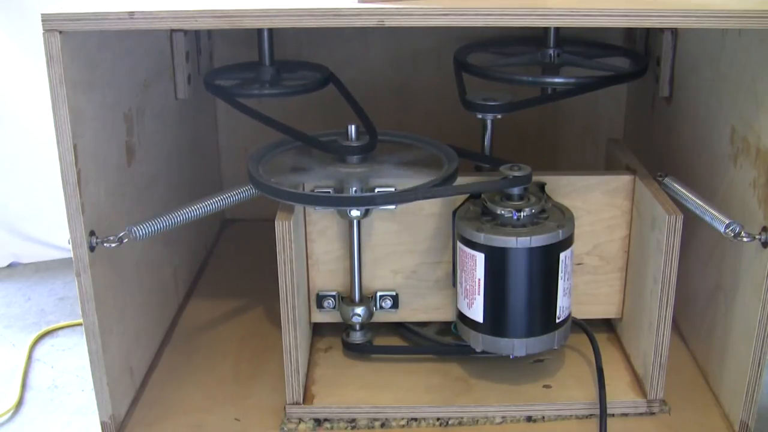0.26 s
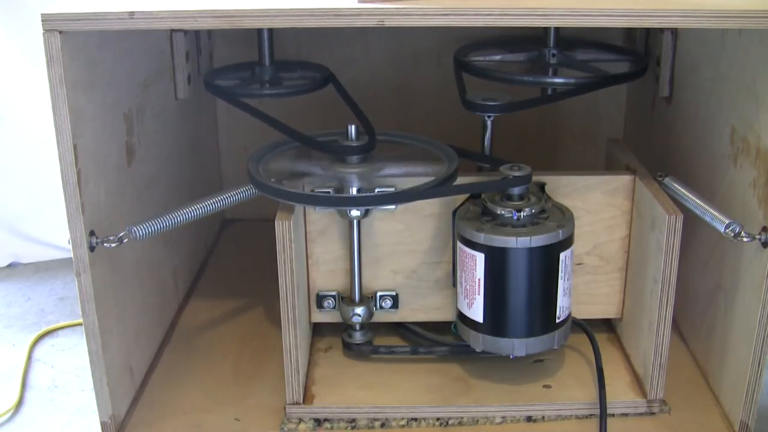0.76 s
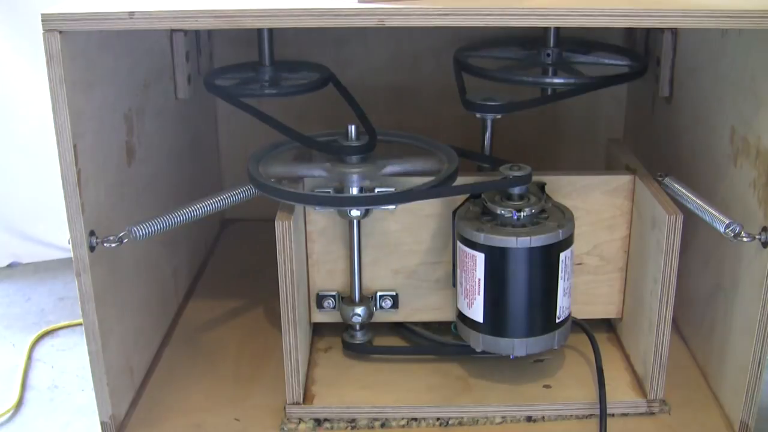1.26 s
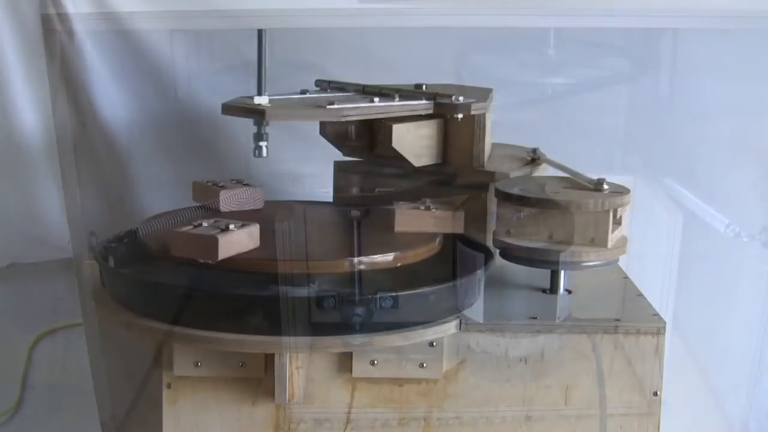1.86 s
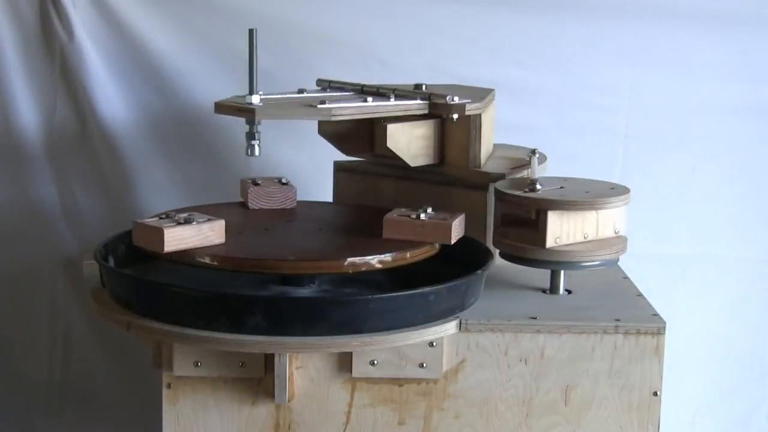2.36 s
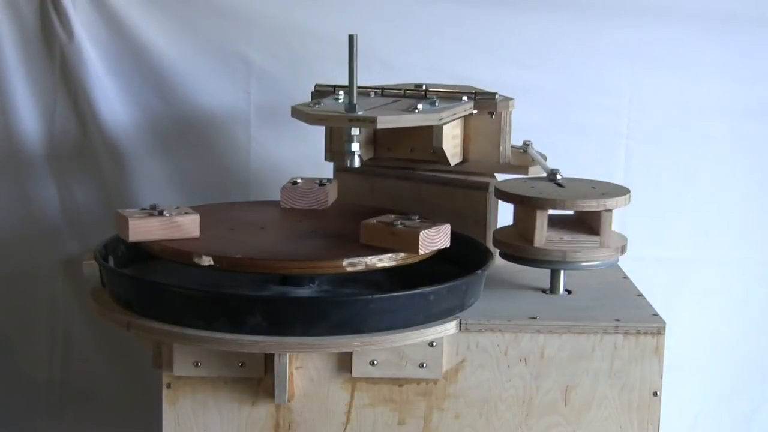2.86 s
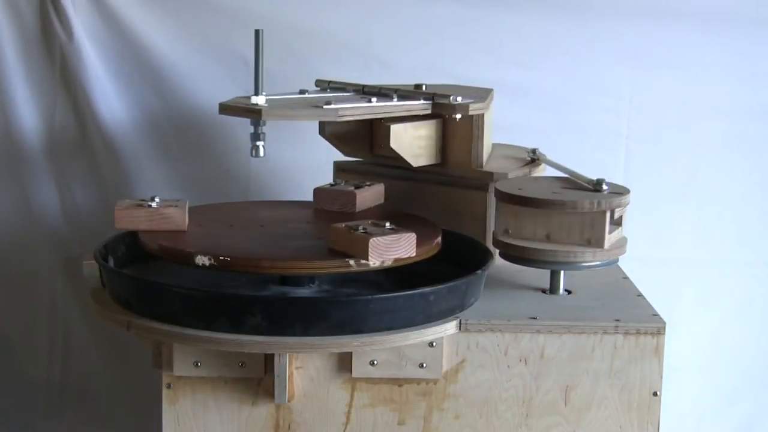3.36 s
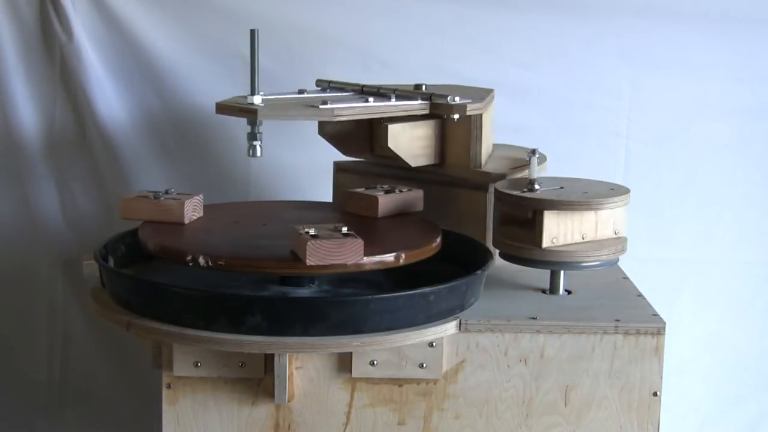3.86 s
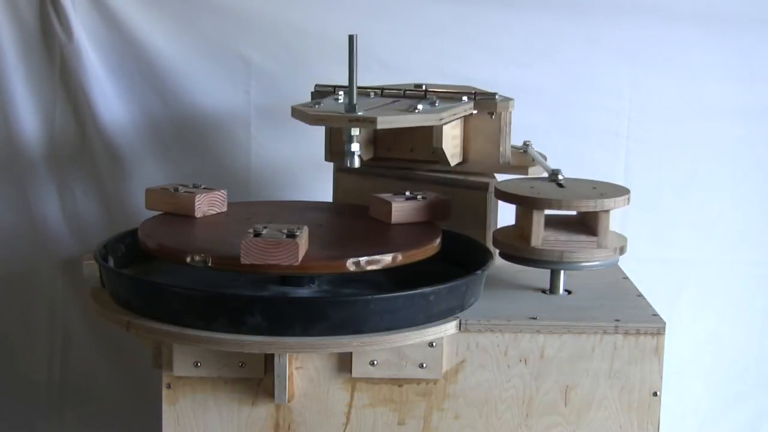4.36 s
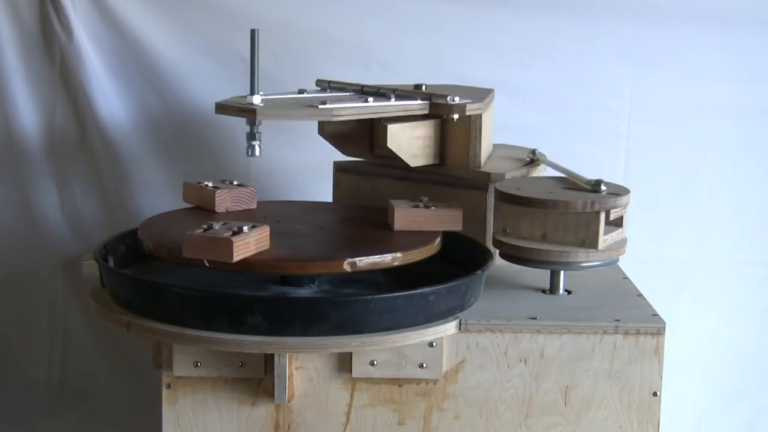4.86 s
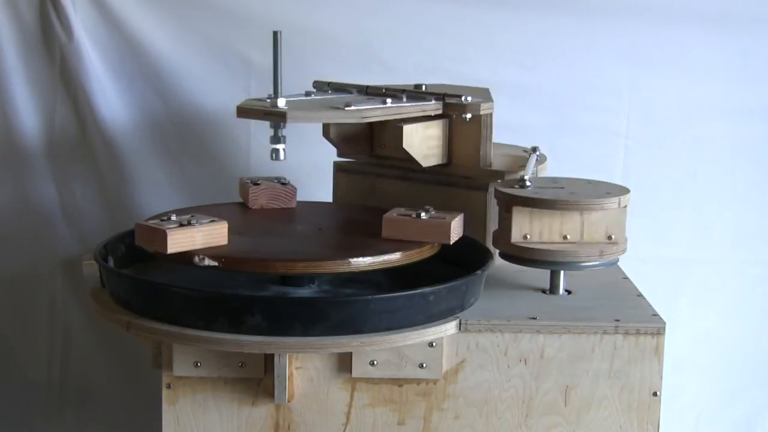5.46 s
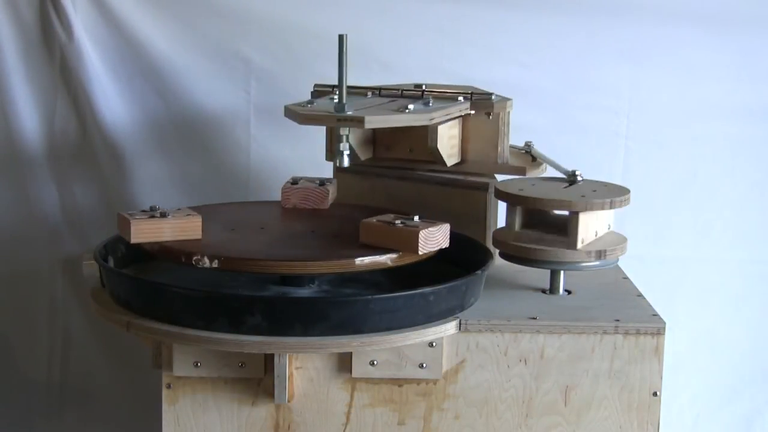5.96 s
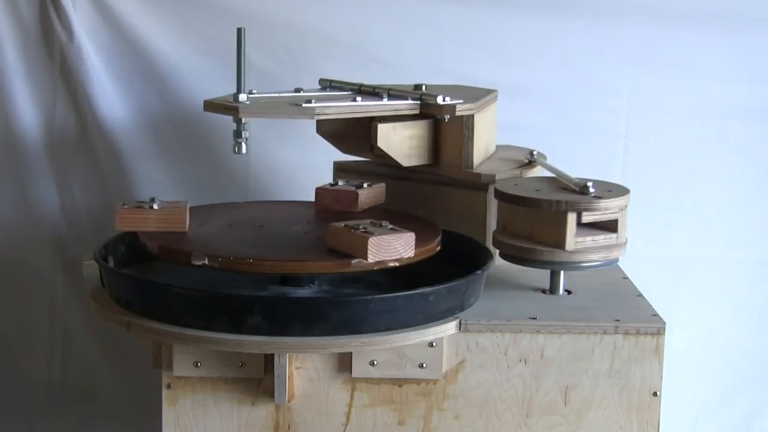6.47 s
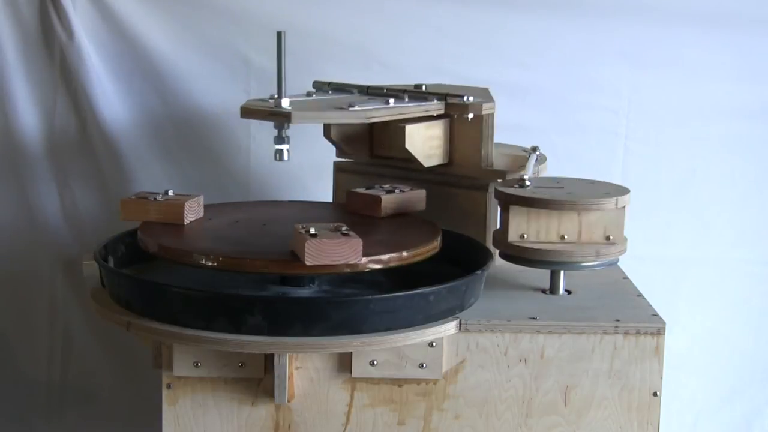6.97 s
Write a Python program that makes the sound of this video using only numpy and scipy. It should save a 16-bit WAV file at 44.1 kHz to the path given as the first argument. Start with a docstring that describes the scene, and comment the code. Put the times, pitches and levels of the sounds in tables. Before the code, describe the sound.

Inside a plywood cabinet a motor and belts hum, pulse and whine; the sound blends to duller machinery above with small woody knocks.

```python
"""Mains hum throbs over belt rumble, rub, rotor whine and bearing hiss; a panel buzz dies, a belt chirps.
An induction motor drives V-belts and a wooden linkage in a plywood cabinet in a workshop.
Heard under the cabinet, then cross-faded to above it, where a swinging arm knocks and scrapes.
Hum, belts, whine, buzz and chirps are wavering sines; rumble and rub are coloured noise.
Bearings and arm joints are noise through resonances; random-phase reflections widen the sound."""
import sys
import numpy as np
from scipy import signal
from scipy.fft import rfft, irfft
from scipy.io import wavfile

SR = 44100
rng = np.random.default_rng(int(sys.argv[2]) if len(sys.argv) > 2 else 0)


def waveform_to_disk(signal):
    """Save audio, clipped to [-1, 1], as 16-bit WAV at the path in sys.argv[1]."""
    frames = np.transpose(np.atleast_2d(signal))
    scaled = np.clip(frames, -1, 1) * 32767
    samples = np.round(scaled).astype(np.int16)
    wavfile.write(sys.argv[1], SR, samples)


N = 317961

MAINS_HZ, SHAFT_HZ = 60, 29.022
BEAT_HZ = 2 * MAINS_HZ - 4 * SHAFT_HZ  # four poles slip past the rotor
FADE_START_S, FADE_END_S = 1.34, 2.224
PANEL_HZ, PANEL_DB, PANEL_SETTLES_S, PANEL_FALL_DB_PER_S = 285.4, -40.5, 0.94, -47
RUB_RISE_S, RUB_RISE_DB_PER_S = 6.33, 2.5  # the rubbing noise then grows steadily louder
CHIRP_HZ = 1020
CRANK_S, FIRST_KNOCK_S = 0.745, 2.678  # one crank turn; knock of turn 0
SCRAPE_DECAY_S, CATCH_AFTER_S = 0.035, 0.046
RIGHT_MINUS_LEFT_DB = 3.5
TOP_HZ = 15400

# Magnetic hum, one row per multiple of twice the mains:
# level_db, throb_db, swell_s, phase_swing_rad, swing_lead_s
HUM_UNDER = [(-27.5, 4.5, 0.177, 0.943, 0.116), (-36.6, 5, 0.045, 0.64, 0.195),
             (-50.5, 4, 0.11, 0.71, 0.092), (-51.5, 6, 0.023, 0.62, 0.13)]
HUM_ABOVE = [(-27.5, 1.6, 0.098, 0.77, 0.12), (-50, 2.8, .11, 1.4, 0.193)]
# Brief sags of the hum: centre_s, depth_db, half_length_s
HUM_SAGS = [(3.023, -5.5, 0.035), (5.52, -3, .16)]
# Flapping belt spans: pitch_hz, under_db, above_db
BELT_SPANS = [(90.7, -54, -46), (95.15, -42.5, -48), (102.1, -41.5, -64), (108.3, -45, -63),
              (142.1, -41, -64), (157.8, -45.5, -64), (267.7, -59, -57)]
# Cabinet rumble spectrum: frequency_hz, relative_density_db_per_hz
RUMBLE_SPECTRUM = [(15, -37), (35, -13.5), (55, -14.5), (72, -14.5), (92, -4.5), (125, 4), (138, -6.5),
                   (160, -6.5), (182, -15.5), (265, -9), (320, -36), (500, -52)]
# Rotor whine: pitch_hz, relative_level_db
WHINE_UNDER = [(4199, -71), (4258, -67.5), (5324, -66.5), (5561, -70), (7246, -72.5), (8393, -64),
               (8484, -65), (8514, -66.5), (8635, -63.5), (9695, -74), (10174, -83)]
WHINE_ABOVE = [(4253, -80.5), (5259, -77.5), (5313, -82), (6261, -81.5), (8382, -77), (8511, -84),
               (8629, -80)]
# Plywood panels (low) and bearing housings (high): resonance_hz, width_hz, under_db, above_db
BEARING_MODES = [(265, 51, -62, -52), (447, 34, -47, -58), (546, 31, -48, -57), (997, 36, -53.5, -60.5),
                 (1410, 130, -50.5, -64.5), (1560, 160, -71, -74), (2920, 780, -62, -74),
                 (4220, 100, -80, -78.5), (5300, 250, -63, -71.5), (8390, 300, -59, -74.5),
                 (9930, 310, -63, -75.5), (11300, 450, -67, -79.5), (12700, 530, -66.5, -83)]
# Belt rub spectrum: frequency_hz, relative_density_db_per_hz
RUB_UNDER = [(180, -4), (300, -1), (484, -0.5), (517, -10.5), (581, 0), (937, -10.5), (1620, -9.5),
             (1810, -16), (3870, -28.5), (4280, -25.5), (4650, -32), (5390, -27), (7750, -34),
             (8560, -26.5), (15500, -50.5)]
RUB_ABOVE = [(180, -63), (300, -5.5), (348, -0.5), (535, 0), (590, -6.5), (674, -3.5), (985, -10),
             (1110, -9.5), (1620, -12), (2210, -20.5), (4800, -32), (5390, -28.5), (6900, -33.5),
             (8560, -32.5), (15500, -52)]
# Pulley and rotor-slot tones: pitch_hz, relative_level_db
TONES_UNDER = [(387.6, -50), (479.1, -51.5), (570.6, -48), (742.9, -55.5), (1297, -60), (1389, -53),
               (1567, -56), (1658, -55.5)]
TONES_ABOVE = [(527.6, -55), (1567, -61), (1599, -61.5), (1658, -65)]
# Faint belt chirps: centre_s, level_db
CHIRPS = [(.92, -46), (1.0, -48), (1.037, -41.5)]
# Joint scrapes: start_s, metal_db, wood_db, second_catch_0_to_1
SCRAPES = [(2.135, -53, -53, .5), (2.382, -48.5, -47, 0.44), (3.87, -52, -60, 0), (5.10, -49.5, -45, 0.6),
           (5.36, -54, -62, 0), (5.49, -55, -53, 0), (6.22, -59, -43, 0), (6.36, -61, -48, 0),
           (6.64, -57, -56, 0)]
# Audible arm reversals: crank_turn, wood_db, metal_db, decay_s
KNOCKS = [(0, -39.5, -57, 0.065), (1, -38, -57, 0.028), (2, -42.5, -68, .035), (4, -38, -54, .033)]
# Arm resonances, wood then metal: resonance_hz, width_hz, relative_level_db
WOOD_MODES = [(420, 81, -3), (654, 38, -3), (870, 42, -0.5), (1020, 160, -6), (1310, 110, -2),
              (1900, 160, -6), (2670, 200, -11), (3000, 220, -17)]
METAL_MODES = [(2500, 680, 6), (3130, 500, 3), (3600, 460, 2.5), (4170, 400, -3), (5200, 900, -6)]
# Diffuse room sound: frequency_hz, relative_side_minus_mid_db
DIFFUSE_SPECTRUM = [(30, -8), (90, -37), (130, -40), (250, -16.5), (500, -14.5), (1000, -12), (2000, -8.5),
                    (4500, -3), (8500, -4.5), (12000, -3)]


def undb(db):
    """Decibels to gain."""
    return np.exp(np.asarray(db) * (np.log(10) / 20))


def clock():
    """Time of every sample, s."""
    return np.arange(N) / SR


def level(x, db):
    """Set the rms level."""
    return x * undb(db) / np.sqrt(np.mean(x ** 2))


def bins():
    """Frequency of every spectral bin, Hz, held at 1 or more."""
    return np.maximum(np.arange(N // 2 + 1) * SR / N, 1)


def colour(x, points):
    """Filter by (Hz, dB) points, interpolated in log frequency."""
    hz, db = np.transpose(points)
    gain = undb(np.interp(np.log(bins()), np.log(hz), db))
    return irfft(rfft(x) * gain, N)


def walk(rate_hz):
    """Smooth random drift of rms 1: eased steps between random knots."""
    size = max(int(SR / rate_hz), 2)
    knots = rng.standard_normal(N // size + 2)
    ease = np.sin(np.pi / 2 * np.arange(size) / size) ** 2
    drift = knots[:-1, None] + np.diff(knots)[:, None] * ease
    return level(drift.ravel()[:N], 0)


def ramp(start_s, db_per_s):
    """Gain that holds at 1, then rises or falls at a steady dB rate."""
    return undb(db_per_s * np.maximum(clock() - start_s, 0))


def tone(hz, db, wander_hz, flutter_db, rate_hz):
    """Sine whose pitch and strength waver."""
    cycles = np.cumsum(hz + wander_hz * walk(rate_hz)) / SR
    phase = 2 * np.pi * (cycles + rng.random())
    return level(np.sin(phase) * undb(flutter_db * walk(rate_hz)), db)


def ring(x, modes):
    """Steep-skirted resonances (Hz, width Hz, dB); each takes its dB from a flat input of rms 1."""
    f, power = bins(), 0
    for hz, width_hz, db in modes:
        detuning = (f ** 2 - hz ** 2) / (f * 2 * width_hz)
        shape = 1 / (1 + detuning ** 2) ** 2
        power = power + undb(2 * db) * shape / shape.mean()
    return irfft(rfft(x) * np.sqrt(power), N)


def friction(shaft_depth, mains_depth, flicker_db):
    """Dense contact noise, pressed harder once a shaft turn and at every torque pulse."""
    turn = 2 * np.pi * clock()
    shaft_press = 1 + shaft_depth * np.cos(SHAFT_HZ * turn)
    torque_press = 1 + mains_depth * np.cos(2 * MAINS_HZ * turn)
    return rng.standard_normal(N) * shaft_press * torque_press * undb(flicker_db * walk(45))


def hum(rows, uneven_db):
    """The stator hums at multiples of twice the mains; the slipping rotor swells and bends it each beat."""
    t, out = clock(), 0
    sag_db = sum(db * np.exp(-((t - s) / length_s) ** 2) for s, db, length_s in HUM_SAGS)
    load = undb(sag_db + uneven_db * walk(9.7))
    for k, (db, throb_db, swell_s, swing_rad, lead_s) in enumerate(rows, 1):
        beat = 2 * np.pi * BEAT_HZ * (t - swell_s)
        bend = swing_rad * np.cos(beat + 2 * np.pi * BEAT_HZ * lead_s)
        carrier = np.sin(2 * np.pi * 2 * k * MAINS_HZ * t + bend)
        out = out + np.sqrt(2) * undb(db + throb_db * np.cos(beat)) * carrier
    return out * load


def belt_flap(index):
    """Flapping belt spans as wavering tones; index 0 is under, 1 above."""
    return sum(tone(row[0], row[1 + index], wander_hz=0.44, flutter_db=3.5, rate_hz=4.9)
               for row in BELT_SPANS)


def cabinet_rumble(db):
    """Broad low noise of the cabinet."""
    return level(colour(rng.standard_normal(N), RUMBLE_SPECTRUM), db)


def rotor_whine(lines, gain_db):
    """High rotor tones that waver in proportion to pitch."""
    return sum(tone(hz, db + gain_db, wander_hz=0.00074 * hz, flutter_db=2.5, rate_hz=30)
               for hz, db in lines)


def bearing_hiss(index):
    """Rolling friction rings panels and bearing housings; index 0 is under, 1 above."""
    rolling = friction(shaft_depth=0.14, mains_depth=0.08, flicker_db=0.5)
    return ring(rolling, [(row[0], row[1], row[2 + index]) for row in BEARING_MODES])


def drive(index, rumble_db, whine_lines, whine_db):
    """Belts, rumble, whine and bearings; index 0 is under, 1 above."""
    low = belt_flap(index) + cabinet_rumble(rumble_db)
    return low + rotor_whine(whine_lines, whine_db) + bearing_hiss(index)


def panel_buzz():
    """A panel buzzes at one wavering pitch, then settles."""
    buzz = tone(PANEL_HZ, PANEL_DB, wander_hz=1.0, flutter_db=3.0, rate_hz=6.6)
    return buzz * ramp(PANEL_SETTLES_S, PANEL_FALL_DB_PER_S)


def belt_rub(spectrum, db, tones, tones_db, flicker_db):
    """Belts rub in their grooves as coloured friction, over tones of pulleys and rotor slots."""
    contact = friction(shaft_depth=0.016, mains_depth=0.042, flicker_db=flicker_db)
    rub = level(colour(contact, spectrum), db)
    lines = sum(tone(hz, line_db + tones_db, wander_hz=2.94, flutter_db=2.5, rate_hz=20)
                for hz, line_db in tones)
    return rub * ramp(RUB_RISE_S, RUB_RISE_DB_PER_S) + lines


def belt_chirps(length_s):
    """A slipping belt sings for a moment: a wavering tone in short bell-shaped bursts."""
    t = clock()
    slips = sum(undb(db) * np.exp(-((t - s) / length_s) ** 2) for s, db in CHIRPS)
    return slips * tone(CHIRP_HZ, 0, wander_hz=12.8, flutter_db=2.0, rate_hz=45)


def under():
    """Close to the motor, inside the open cabinet."""
    motor = hum(HUM_UNDER, uneven_db=0.9)
    motor = motor + drive(index=0, rumble_db=-36.5, whine_lines=WHINE_UNDER, whine_db=2.5)
    rub = belt_rub(RUB_UNDER, -36.7, TONES_UNDER, tones_db=0.46, flicker_db=0.93)
    return motor + panel_buzz() + rub + belt_chirps(length_s=0.015)


def slide(start_s, rise_s, decay_s):
    """Envelope of a joint taking up its play: a quick rise, then a decay."""
    start = int(start_s * SR)
    age_s = np.arange(min(SR, N - start)) / SR
    push = (1 - np.exp(-age_s / rise_s)) * np.exp(-age_s / decay_s)
    return np.pad(push, (start, N - start - len(age_s)))


def arm_joints(rise_s, grain_db):
    """The arm scrapes in its joints and knocks at crank reversals; gritty slides ring wood and metal."""
    wood, metal = 0, 0
    for s, metal_db, wood_db, catch in SCRAPES:
        push = slide(s, rise_s, SCRAPE_DECAY_S)
        push = push + catch * slide(s + CATCH_AFTER_S, rise_s, SCRAPE_DECAY_S)
        wood, metal = wood + undb(wood_db) * push, metal + undb(metal_db) * push
    for turn, wood_db, metal_db, decay_s in KNOCKS:
        push = slide(FIRST_KNOCK_S + turn * CRANK_S, rise_s, decay_s)
        wood, metal = wood + undb(wood_db) * push, metal + undb(metal_db) * push
    grit = undb(grain_db * walk(300))
    wood_ring = level(ring(grit * rng.standard_normal(N), WOOD_MODES), 0)
    metal_ring = level(ring(grit * rng.standard_normal(N), METAL_MODES), 0)
    return wood * wood_ring + metal * metal_ring


def above():
    """Above the cabinet, which muffles the motor, beside the arm."""
    motor = hum(HUM_ABOVE, uneven_db=0.0)
    motor = motor + drive(index=1, rumble_db=-39.5, whine_lines=WHINE_ABOVE, whine_db=2.0)
    rub = belt_rub(RUB_ABOVE, -44.45, TONES_ABOVE, tones_db=-2.0, flicker_db=0.5)
    return motor + rub + arm_joints(rise_s=0.0036, grain_db=1)


def workshop(x, decay_s, diffuse_db):
    """Wall reflections reach the two sides differently, most of all in the treble and far from the motor."""
    reflections = rng.standard_normal(N) * np.exp(-clock() / decay_s)
    scatter = np.exp(1j * np.angle(rfft(reflections)))  # phase only
    side = undb(diffuse_db) * colour(irfft(rfft(x) * scatter, N), DIFFUSE_SPECTRUM)
    left = x * undb(-RIGHT_MINUS_LEFT_DB / 2) + side
    right = x * undb(RIGHT_MINUS_LEFT_DB / 2) - side
    return np.array([left, right])


def scene():
    """Equal-power cross-fade from under the cabinet to above it."""
    progress = np.clip((clock() - FADE_START_S) / (FADE_END_S - FADE_START_S), 0, 1)
    fade = np.pi / 2 * progress
    inside = workshop(under(), decay_s=0.035, diffuse_db=-1.0)
    outside = workshop(above(), decay_s=0.068, diffuse_db=3.0)
    return np.cos(fade) * inside + np.sin(fade) * outside


def record(dry):
    """Fade in over 3 ms and cut the top with a steep low-pass."""
    opening = np.minimum(clock() / 0.003, 1)
    low_pass = signal.ellip(10, rp=0.2, rs=80, Wn=TOP_HZ, fs=SR, output="sos")
    return signal.sosfilt(low_pass, dry * opening)


dry = scene()
out = record(dry)
waveform_to_disk(out)
```